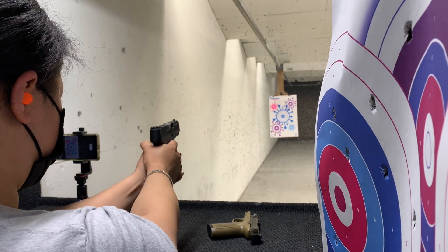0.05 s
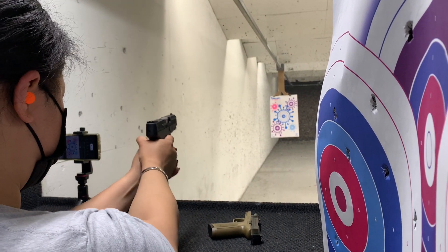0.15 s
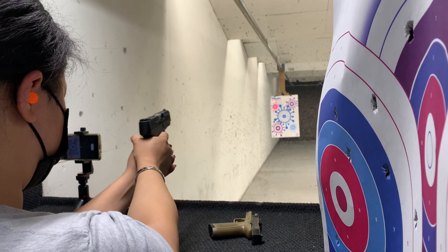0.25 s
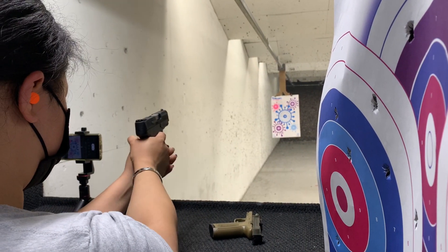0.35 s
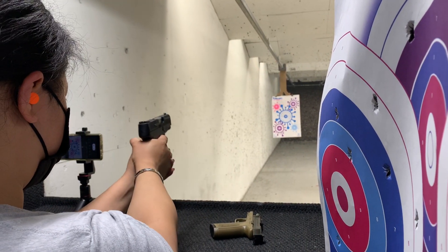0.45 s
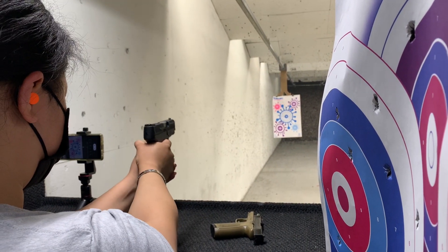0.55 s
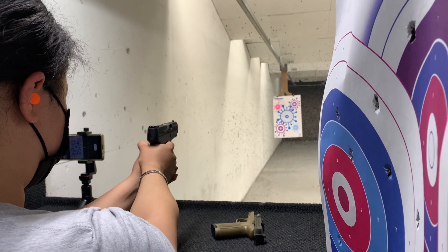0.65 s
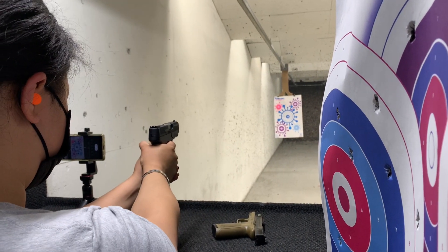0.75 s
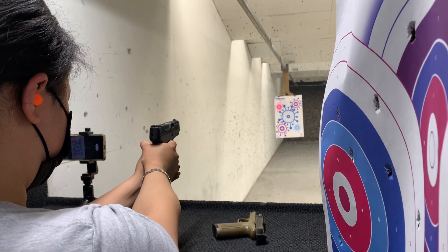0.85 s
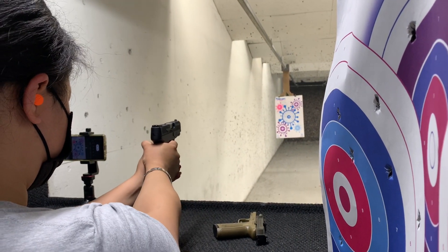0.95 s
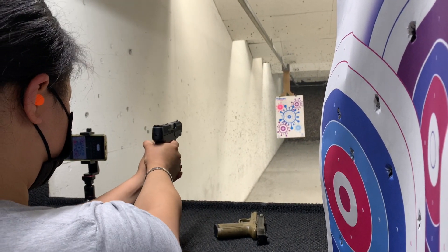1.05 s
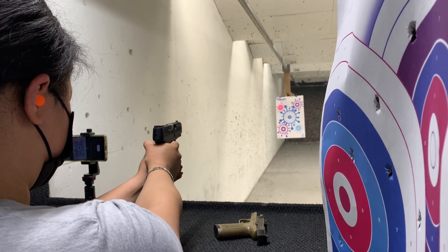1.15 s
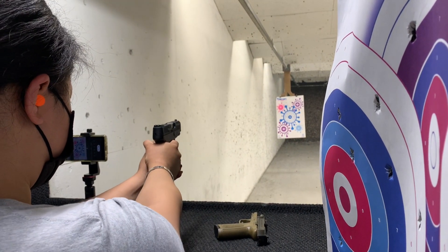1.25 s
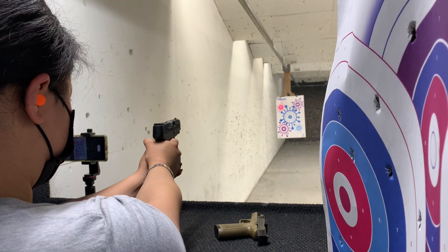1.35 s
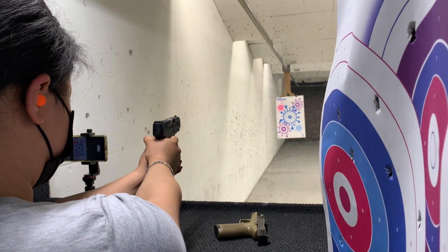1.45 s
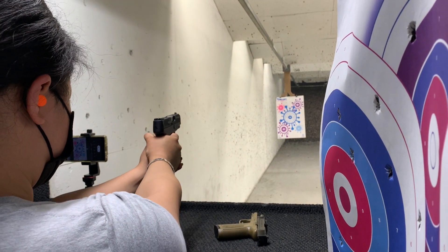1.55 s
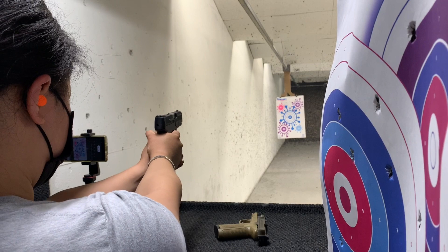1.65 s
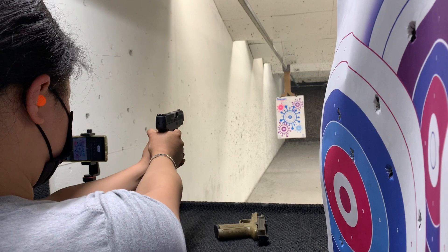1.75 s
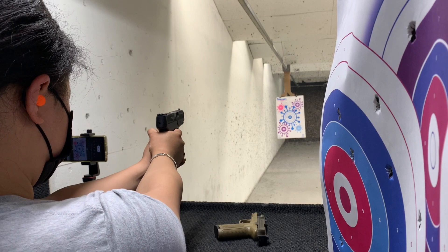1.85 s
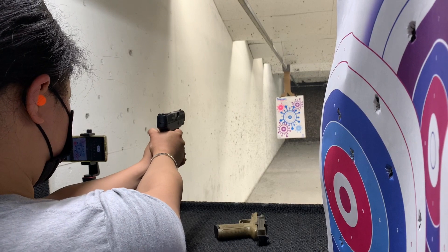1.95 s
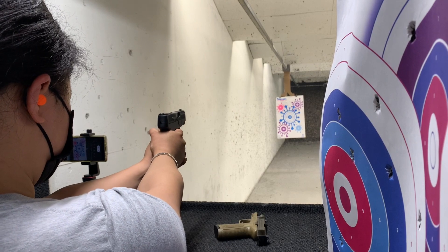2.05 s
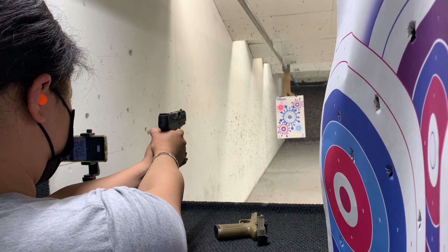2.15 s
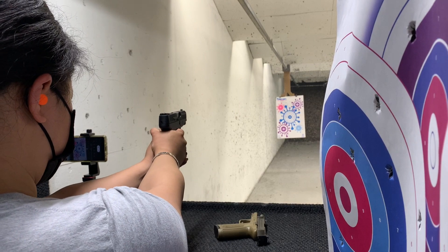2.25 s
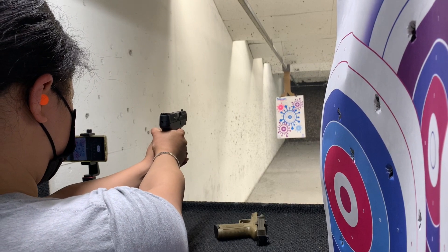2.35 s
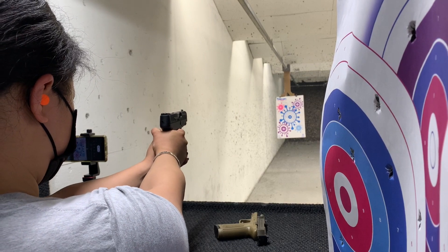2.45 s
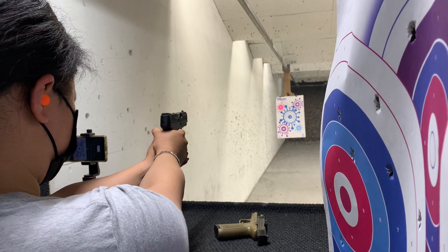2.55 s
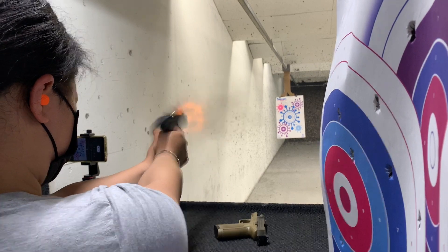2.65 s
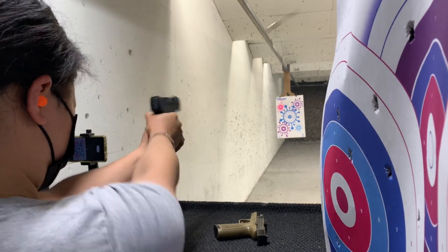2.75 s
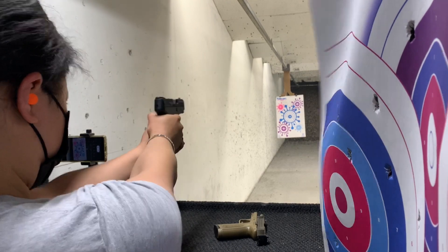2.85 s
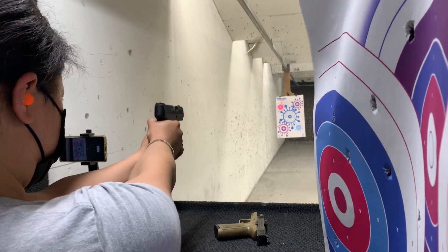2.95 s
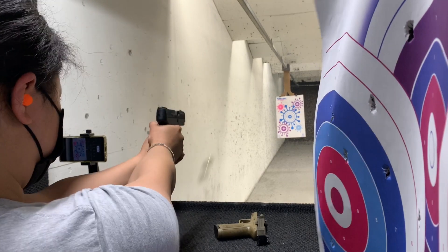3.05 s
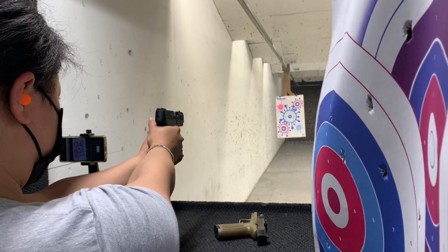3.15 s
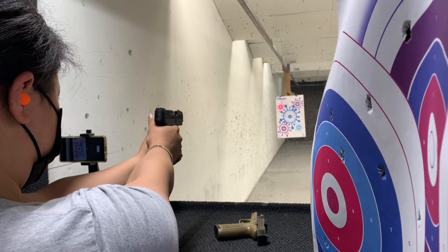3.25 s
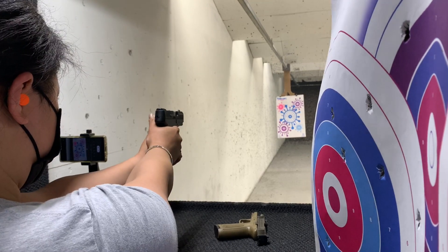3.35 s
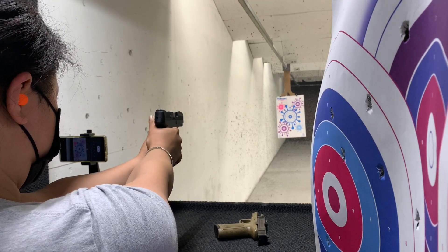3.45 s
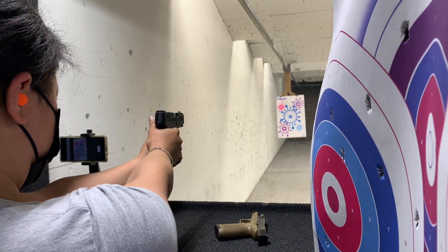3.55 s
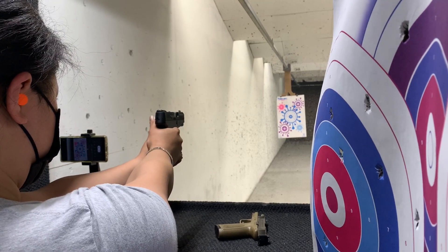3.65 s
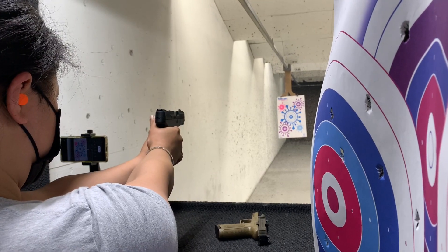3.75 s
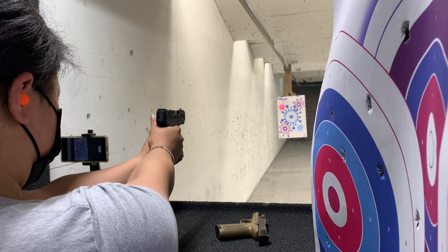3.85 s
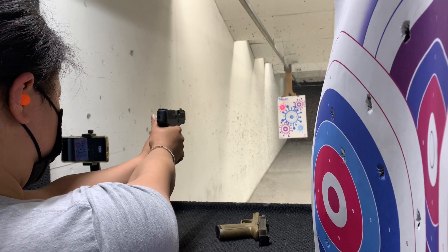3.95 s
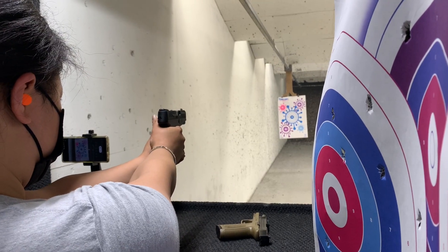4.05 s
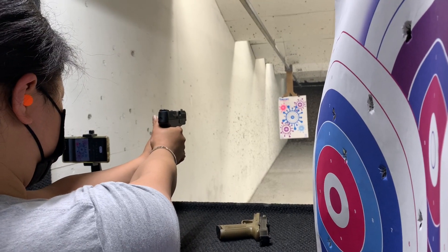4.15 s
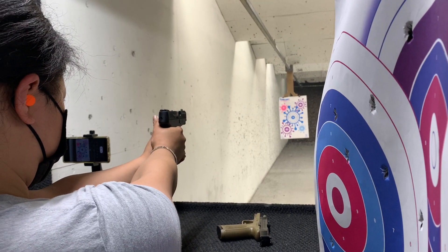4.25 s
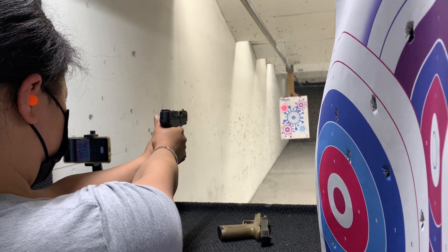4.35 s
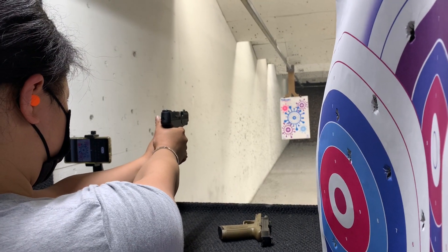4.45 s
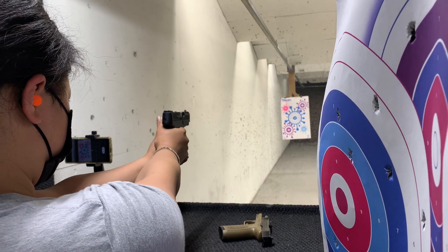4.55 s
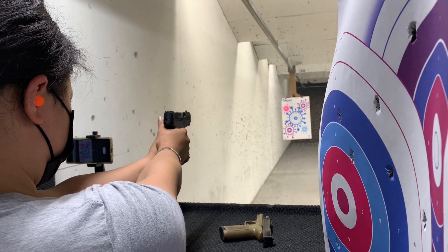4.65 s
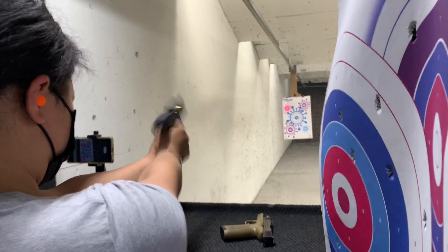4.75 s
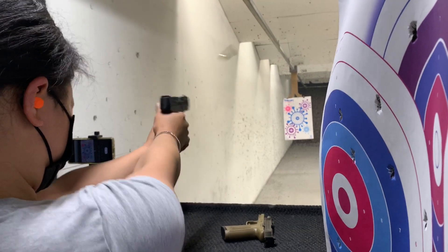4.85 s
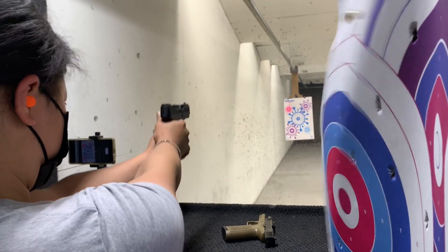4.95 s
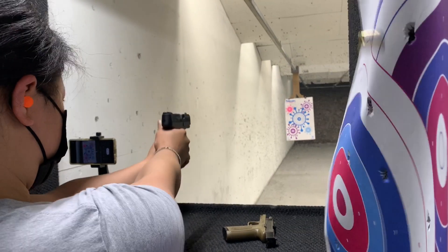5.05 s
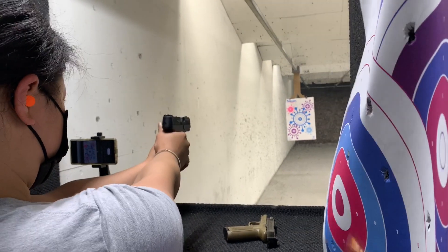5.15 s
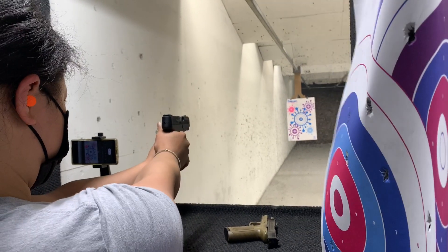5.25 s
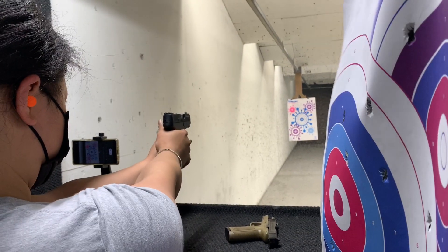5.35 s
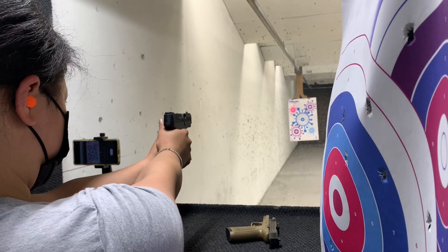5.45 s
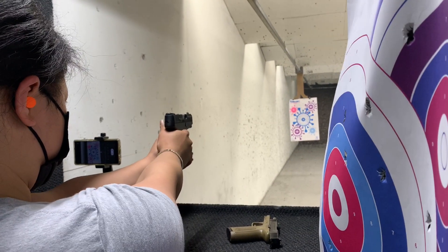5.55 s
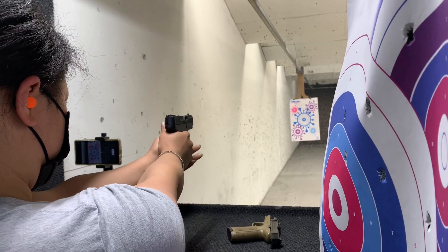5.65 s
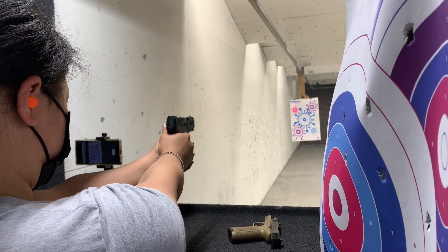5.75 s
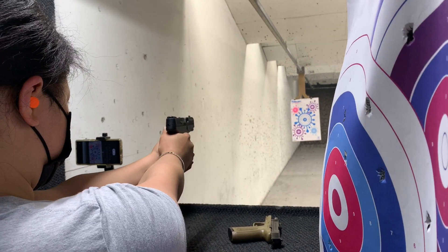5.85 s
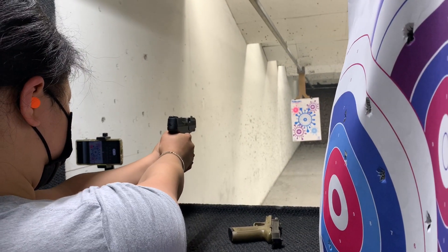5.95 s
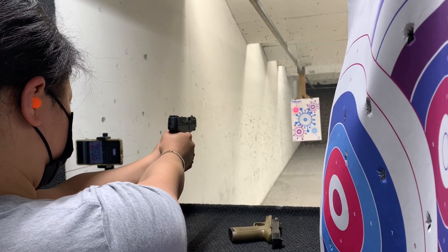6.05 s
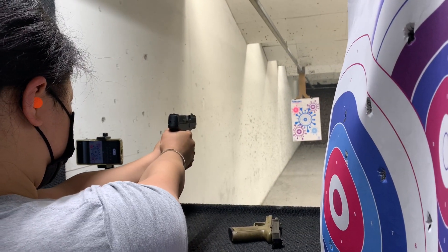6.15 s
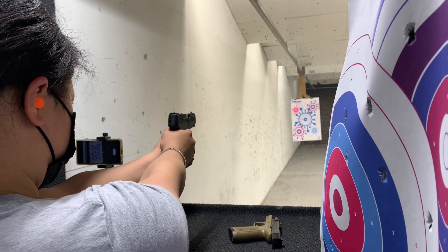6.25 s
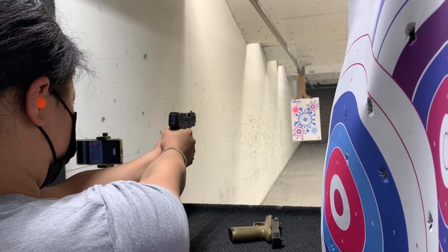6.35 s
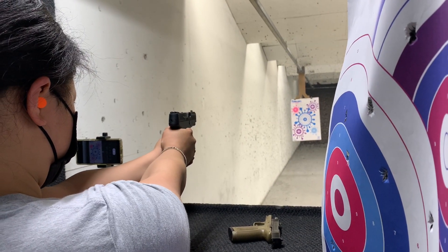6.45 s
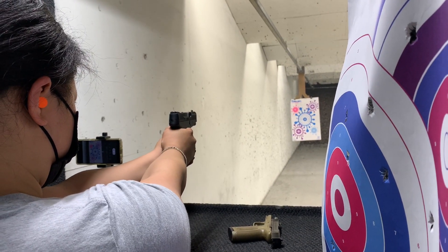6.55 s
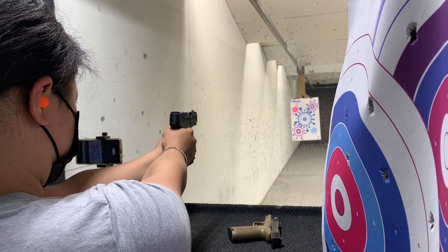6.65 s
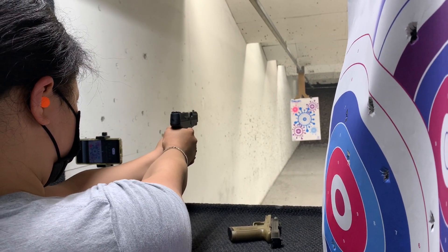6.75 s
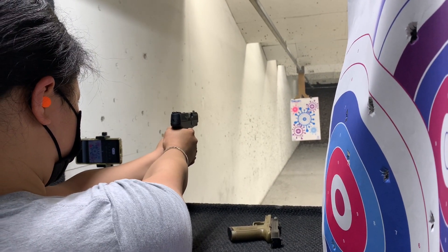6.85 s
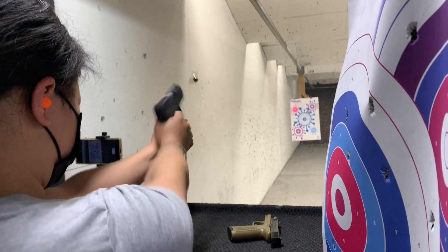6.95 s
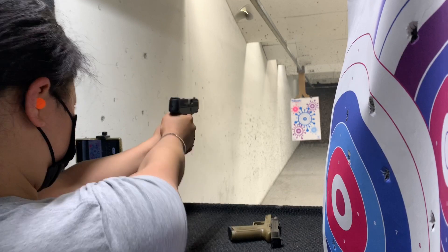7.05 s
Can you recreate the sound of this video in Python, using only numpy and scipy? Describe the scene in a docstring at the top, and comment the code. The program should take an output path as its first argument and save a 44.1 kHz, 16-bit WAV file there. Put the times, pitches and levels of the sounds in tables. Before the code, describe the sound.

A low ventilation rumble with faint fan hum fills a concrete indoor range, a previous shot's resonance still dying. At about 0.6, 1.0 and 1.35 seconds a pistol in the next booth fires three thick, booming blasts, rattling the partition. Small brass cases clack and ping on concrete around 1.9 to 2.4. At 2.55 a farther shot is overtaken by a sharp, close crack at 2.65. Cases tinkle and hop from 3.1 to 4, with faint soft scrapes near 3.3 and 4.2. Another close shot cracks at 4.75, then a distant boom at 5.06. A bright case pings at 5.5 and bounces in quickening hops past 6. One more faint ping at 6.7 precedes the last close blast at 6.9, cut short in its echo. About 0.2 seconds after each earlier shot the room tail swells again as the limiter releases, leaving faint, beating steel ringing. Close stereo microphone, peaks rounded off.

```python
"""Three pistols in an indoor range

Recorded on two microphone ports: one pistol just ahead, one in the next booth and one further off.
Each shot is a crack and a boom of shaped noise, then a second swell of the room tail about 0.2 s on,
as the recorder's limiter lets go; this late swell is written in as noise at a set delay and level.
Damped sines make the standing waves and the steel fittings that ring on. Spent brass cases ping, clack
and hop on the concrete, with faint scrapes between, over rumbling ventilation and two fan lines."""
import sys
import numpy as np
from scipy import signal
from scipy.fft import rfft, irfft, next_fast_len
from scipy.io import wavfile
from scipy.ndimage import map_coordinates

SR = 44100
rng = np.random.default_rng(int(sys.argv[2]) if len(sys.argv) > 2 else 0)


def master_out(mix):
    """Clip the mix to full scale and print it as 16-bit PCM to the path in sys.argv[1]."""
    frames = np.transpose(np.atleast_2d(mix))
    ceiling = np.clip(frames, -1, 1)
    pcm = np.round(ceiling * 32767).astype(np.int16)
    wavfile.write(sys.argv[1], SR, pcm)


N = 313110  # length of the scene (samples)
AGE = np.arange(2 * SR) / SR  # time since a blow (s)
BRIEF = np.arange(SR // 2) / SR  # the same for short sounds (s)

# the shots: (time [s], pistol, crack level [dB], boom level [dB], late swell level [dB],
# ringing steel level [dB], standing wave level [dB])
SHOTS = [(0.643, "next", -15, -12, -27, -61, -39.5), (1.000, "next", -12, -13, -28.5, -61.5, -39.5),
         (1.350, "next", -14.5, -12.5, -34, -59, -38), (2.549, "far", -24, -21.5, -31.5, -65.5, -44.5),
         (2.652, "own", -12.5, -17, -31.5, -62, -36.5), (4.7466, "own", -15.5, -15.5, -27.5, -72.5, -37.5),
         (5.064, "far", -21.5, -16.5, -32.5, -67.5, -26.5), (6.8962, "own", -14, -16, -27.5, -64, -36.5)]
# colour of the slap of a blast off the near booth: (frequency [Hz], relative level [dB per Hz])
SLAP_COLOUR = [(250, -21.5), (550, -2.5), (750, -5), (1100, 0.5), (1500, -7.5), (3000, -15.5), (12000, -38)]


def amp(db):
    """Decibels to gain."""
    return 10 ** (np.asarray(db) / 20)


def unit(x):
    """Scale to rms 1."""
    return x / np.sqrt(np.mean(x ** 2) + 1e-20)


def along(points, hz):
    """Read (frequency, value) points at hz, on a log frequency axis."""
    f, v = np.transpose(points)
    return np.interp(np.log(hz + 1), np.log(f + 1), v)


def wobble(rate, size):
    """A smooth random curve with rate knots a second."""
    knots = rng.standard_normal(int(size * rate / SR) + 4)
    return map_coordinates(knots, [np.arange(size) * rate / SR])


def filtered(x, response):
    """Shape x by a response given as a function of frequency."""
    n = x.shape[-1]
    m = next_fast_len(n + SR // 4)  # padded, so that the end does not wrap onto the start
    return irfft(rfft(x, m) * response(np.fft.rfftfreq(m, 1 / SR)), m)[..., :n]


def add(track, s, sound):
    """Mix a sound into the track at time s, cut where the track ends."""
    room = track[:, round(s * SR):][:, :sound.shape[-1]]
    room += sound[..., :room.shape[-1]]


def white(t=AGE):
    """Two unrelated white noises."""
    return rng.standard_normal((2, len(t)))


def field(noise, spectrum):
    """Colour a noise pair into left and right: much alike in the bass, less so above."""
    # stereo width: (frequency [Hz], side over mid [dB])
    width = [(50, -9), (150, -7), (280, -3.5), (450, -1.5), (800, 4), (1600, 0), (4000, 0), (14000, 0)]
    mid, side = filtered(noise, lambda hz: amp(along(spectrum, hz)))
    side = filtered(side, lambda hz: amp(along(width, hz)))
    return np.array([mid + side, mid - side]) / np.std(mid)


def dying(x, t60, hold):
    """Hold the level, then let each frequency die at its own speed."""
    hz, t, z = signal.stft(x, SR, nperseg=512)
    fade = amp(-60 * np.maximum(t - hold, 0) / along(t60, hz)[:, None])
    return signal.istft(z * fade, SR, nperseg=512)[1][:, :x.shape[-1]]


def swell(rise, t=AGE):
    """A smooth rise from 0 to 1."""
    return 1 - np.exp(-(t / rise) ** 2)


def ring(modes, scatter_db, t=AGE):
    """Damped modes, struck at new strengths and heard at slightly different phases by the two ports."""
    out = np.zeros((2, len(t)))
    for hz, db, t60 in modes:
        phase = rng.uniform(0, 2 * np.pi) + rng.standard_normal((2, 1)) / 2
        strength = amp(db + scatter_db * rng.standard_normal())
        fade = strength * np.exp(-np.log(1000) * t / t60)
        out += fade * np.sin((2 * np.pi * hz * t + phase).astype(np.float32))
    return out * np.minimum(1, 10 * (t[-1] - t))  # the last trace of the ring fades to silence


def shots_of(who):
    """Time and levels of the shots of one pistol."""
    return [(s, *levels) for s, name, *levels in SHOTS if name == who]


def ventilation():
    """Air rumbles in the ducts under the slightly unsteady lines of the fans."""
    # colour of the duct air: (frequency [Hz], relative level [dB per Hz])
    air_colour = [(20, -43), (39, -16), (58, -3.5), (86, -20), (150, -15), (250, -29), (400, -36.5),
                  (700, -43.5), (1500, -50.5), (4000, -60), (10000, -66), (16000, -73)]
    # fan lines: (frequency [Hz], mean level [dB])
    fan_lines = [(58, -67.5), (150, -81.5)]
    out = amp(-66.5 + .7 * wobble(1, N)) * field(rng.standard_normal((2, N)), air_colour)
    t = np.arange(N) / SR
    for hz, db in fan_lines:
        level = np.sqrt(2) * amp(db + 1.5 * wobble(3, N))
        out += level * np.sin(2 * np.pi * hz * t + 1.1 * wobble(6, N))
    return out


def scuffs():
    """Faint, soft scrapes between the shots: noise that swells, dies and flutters in level."""
    # the scrapes: (time [s], level [dB], rise [s], t60 [s])
    scrapes = [(3.345, -68, 0.0085, 0.62), (4.16, -77, .02, 0.94)]
    # their colour: (frequency [Hz], relative level [dB per Hz])
    colour = [(600, -6), (1500, 1.5), (4000, -2), (8000, -8), (15000, -16.5)]
    out = np.zeros((2, N))
    for s, db, rise, t60 in scrapes:
        level = amp(db - 60 * AGE / t60 + 2.5 * wobble(60, len(AGE)))
        add(out, s, field(white(), colour) * swell(rise) * level)
    return out


def contacts():
    """Each case lands and may hop on, every contact softer and lower in clack than the last."""
    # cases landing: (time [s], first ping level [dB], first clack level [dB],
    # first clack pitch [Hz], first hop [s], number of hops)
    landings = [(1.935, -72, -68, 5400, .286, 1), (2.395, -78.5, -66, 5230, 0, 0),
                (2.422, -70, -58.5, 5150, 0, 0), (3.127, -87, -68, 5310, 0, 0),
                (3.403, -62.5, -67, 4800, .535, 1), (3.535, -76, -75.5, 4200, 0, 0),
                (5.527, -60, -69.5, 5370, .527, 3), (6.725, -73.5, -92, 5280, 0, 0)]
    hop_shrink = .495  # each hop lasts this share of the one before
    ping_loss_db, clack_loss_db, wash_loss_db = 5, 2.2, 7.5  # lost at each bounce
    clack_sag = 0.925  # clack pitch over that of the contact before
    for s, ping_db, clack_db, clack_hz, hop, hops in landings:
        wash_db = (ping_db + clack_db) / 2 - 3.5
        for k in range(round(hops) + 1):
            yield (s, ping_db - k * ping_loss_db, clack_db - k * clack_loss_db,
                   clack_hz * clack_sag ** k, wash_db - k * wash_loss_db)
            s = s + hop * hop_shrink ** k


def cases():
    """Each case clacks on the concrete, pings as its brass modes ring, and leaves a faint wash in the room."""
    # modes of a brass case: (frequency [Hz], relative level [dB], t60 [s])
    brass = [(10790, -2.5, .4), (10800, -5.5, .42), (13470, -14, .15)]
    # colour of the contact noise: (frequency [Hz], relative level [dB per Hz])
    clack_colour = [(1500, -20.5), (3200, -3), (5000, -1.5), (7000, -2.5), (10000, -1.5), (13500, -1.5),
                    (16000, -11.5)]
    out, t = np.zeros((2, N)), BRIEF
    for s, ping_db, clack_db, clack_hz, wash_db in contacts():
        ping = ring(brass, scatter_db=-4.5, t=t) * amp(2.5 * wobble(90, len(t)))
        noise = field(white(t), clack_colour)
        # a resonance of Q 7 gives the clack its pitch
        clack = unit(filtered(noise, lambda hz: 1 / (1 + 7j * (hz / clack_hz - clack_hz / (hz + 1)))))
        clack = clack * (amp(1 - 60 * t / 0.037) + amp(-13 - 60 * t / .33))
        slow_wash = amp(-2.5 - 60 * t / 0.4) * swell(0.0089, t)
        quick_wash = amp(9.0 - 60 * t / 0.016)
        wash = noise * (slow_wash + quick_wash)
        contact = amp(ping_db) * ping + amp(clack_db) * clack + amp(wash_db) * wash
        add(out, s, contact * swell(0.0008, t))
    return out


def afterring(twin_db, split_hz, earlier_db):
    """Standing waves and steel outlast the boom; like fittings are slightly detuned, so their lines beat."""
    # steel fittings that ring after every shot: (frequency [Hz], relative level [dB], t60 [s])
    fittings = [(463, 3, 1), (510, 8, 1.7), (738, -8, 2.8), (765, -6.5, 1.6), (808, -3, 2.7),
                (866, -2.5, 2.5), (894, 2.5, 2), (930, 0.5, 2.2), (990, -7.5, 2.8), (1023, -9.5, 2.2),
                (1060, -7, 2.1), (1130, -9, 3.2), (1170, -7, 2.9), (1250, -8, 2.5), (1330, -4.5, 1.9),
                (1367, -4.5, 2.4), (1432, -7.5, 2.2), (1530, -8.5, 2.4), (1723, -8.5, 2.1),
                (1846, -12.5, 1.9), (2008, -17, 2.7), (2300, -17, 3.8), (2370, -15.5, 3.2),
                (2552, -17, 2.1)]
    # standing waves between the walls: (frequency [Hz], relative level [dB], t60 [s])
    standing = [(160.3, 1, 1.75), (285, -16, .9), (327, -14, 1), (347, -11, .85)]
    # one long-lived fitting, whose two close modes beat about seven times a second: (frequencies [Hz])
    long_hz = (622.2, 629.1)
    long_modes = [(hz, -76, 12) for hz in long_hz]  # (Hz, mean dB when stirred, t60 s)
    out = np.zeros((2, N))
    for s, *_, steel_db, wave_db in SHOTS:
        twins = [(hz + split_hz * rng.standard_normal(), db + twin_db, t60) for hz, db, t60 in fittings]
        steel = amp(steel_db) * ring(fittings + twins, scatter_db=1.5)
        waves = amp(wave_db) * ring(standing, scatter_db=3.0)
        add(out, s, (steel + waves) * swell(.025))
    t = np.arange(N) / SR
    # near blasts, or a run of them, stir the long-lived fitting
    for s, *_ in shots_of("own") + shots_of("next")[-1:]:
        long_ring = ring(long_modes, scatter_db=.5, t=t)
        add(out, s, long_ring * swell(.025, t) * amp(1.5 * wobble(7.6, N)))
    add(out, 0, amp(earlier_db) * ring(standing[:1], scatter_db=1.5))  # still dying from an earlier shot
    return out


def partition(ring_hz, db, t60, delay, rise, lag, blur):
    """The next pistol's blast rattles the booth wall; the second port hears its tone about a quarter cycle late."""
    out, t = np.zeros((2, N)), BRIEF
    for s, *_ in shots_of("next"):
        phase = 2 * np.pi * ring_hz * (t - np.array([[0], [lag]])) + blur * wobble(280, len(t))
        rattle = np.sin(phase) + 0.25 * field(white(t), SLAP_COLOUR)
        add(out, s + delay, amp(db - 60 * t / t60) * swell(rise, t) * rattle)
    return out


def pistol(shots, crack_colour, boom_colour, crack_rise, crack_hold, crack_t60,
           boom_rise, boom_hold, treble_hold, clump_db):
    """Crack, boom and late swell of one pistol; the paths to the walls stay nearly the same each shot."""
    # decay of the boom and of the late swell: (frequency [Hz], t60 [s])
    boom_t60 = [(60, 0.19), (250, 0.56), (800, 0.42), (3000, 0.47), (12000, 0.38)]
    late_t60 = [(60, 1.4), (160, 1), (400, 0.82), (1100, 0.66), (3000, 0.87), (8000, 0.5), (14000, 0.52)]
    # colour of the late swell: (frequency [Hz], relative level [dB per Hz])
    late_colour = [(18, -45.5), (30, -21.5), (59, -8), (107, -18), (158, -2.5), (312, -2), (426, -2),
                   (754, -17), (1410, -21), (1780, -26.5), (8250, -44), (10400, -47.5), (11900, -67),
                   (13200, -56), (15000, -65.5)]
    out = np.zeros((2, N))
    crack_paths, boom_paths = white(), white()
    clumps = unit(amp(clump_db * wobble(900, len(AGE))))  # reflections in bunches; even at 0 dB

    def fresh(paths):
        """Mostly the lasting paths, with some new noise."""
        return (2 * paths + white()) / np.sqrt(5)

    for s, crack_db, boom_db, late_db, *_ in shots:
        crack_fade = amp(-60 * np.maximum(AGE - crack_hold, 0) / crack_t60)
        crack = field(fresh(crack_paths), crack_colour) * swell(crack_rise) * crack_fade
        walls = field(fresh(boom_paths) * clumps, boom_colour)
        body = filtered(walls, lambda hz: 1 / (1 + (hz / 2000) ** 4))
        treble = walls - body
        # the treble is absorbed sooner than the body of the boom
        boom = dying(body, boom_t60, boom_hold) + dying(treble, boom_t60, treble_hold)
        boom = boom * swell(boom_rise)
        add(out, s, amp(crack_db) * crack + amp(boom_db) * boom)
        late_swell = dying(field(white(), late_colour), late_t60, hold=0.051) * swell(0.043)
        add(out, s + .19, amp(late_db) * late_swell)
    return out


def muzzle(snap_db, t60, slap_db, slap_delay, slap_t60):
    """The nearest blast comes straight to the microphone, slaps back off its booth and sets it ringing."""
    # colour of the direct blast: (frequency [Hz], relative level [dB per Hz])
    snap_colour = [(300, -15.5), (900, -3), (2500, -1.5), (6000, -0.5), (10000, -5.5), (16000, -6)]
    # modes of the booth: (frequency [Hz], mean level [dB], t60 [s])
    booth = [(247.6, -20.5, 0.77), (497, -10, 0.14), (682, -18, .3), (785, -24, 0.38), (1012, -24, .28),
             (1150, -24, 0.55), (1300, -24, 0.17)]
    out, t = np.zeros((2, N)), BRIEF
    for s, *_ in shots_of("own"):
        snap = field(white(t), snap_colour) * amp(snap_db - 60 * t / t60) * swell(.0006, t)
        add(out, s, snap + ring(booth, scatter_db=1.5, t=t) * swell(0.012, t))
        slap = field(white(t), SLAP_COLOUR) * amp(slap_db - 60 * t / slap_t60)
        add(out, s + slap_delay, slap * swell(0.0012, t))
    return out


def scene():
    """Three shooters, their brass and the room; rises, holds, delays and t60 in seconds."""
    # crack and boom colours of each pistol: (frequency [Hz], relative level [dB per Hz])
    own_crack = [(35, -41.5), (60, -8.5), (244, -15), (651, 1), (1110, -7.5), (1380, -15.5), (1950, -10),
                 (3040, -17), (8920, -33), (10000, -18.5), (11800, -27), (13300, -28), (16000, -47.5)]
    own_boom = [(18, -40.5), (30, -14.5), (112, -6.5), (266, -7), (394, -9), (486, -3.5), (1070, -16),
                (1220, -14.5), (1460, -21.5), (1590, -17.5), (1860, -20.5), (8300, -30.5), (12000, -36.5),
                (13300, -34), (16000, -63.5)]
    next_crack = [(59, -37), (100, -5.5), (271, -4), (736, -2.5), (991, -7), (2040, -7.5), (3400, -17),
                  (8640, -19), (11600, -32.5), (13200, -29.5), (16000, -44)]
    next_boom = [(18, -41.5), (30, -26), (59, -10.5), (112, -11.5), (233, -2.5), (394, -5.5), (512, -6.5),
                 (632, -3.5), (844, -11), (1220, -12), (2410, -22.5), (9970, -31), (11700, -37.5),
                 (13300, -32), (16000, -53)]
    far_crack = [(59, -29), (100, -4.5), (1870, -8), (3250, -20), (3700, -15), (9610, -30), (11900, -33.5),
                 (13500, -34.5), (16000, -47)]
    far_boom = [(18, -44.5), (30, -12.5), (95, -9.5), (184, -0.5), (259, -7), (336, -4), (554, -4),
                (1190, -16), (1960, -18.5), (9460, -33), (12000, -42.5), (13300, -34.5), (16000, -69.5)]
    room = ventilation() + scuffs() + cases()
    ringing = afterring(twin_db=-1, split_hz=9.2, earlier_db=-56.5)
    wall = partition(ring_hz=606, db=-7.0, t60=0.05, delay=.012, rise=0.0022, lag=0.00044, blur=1.1)
    far = pistol(shots_of("far"), far_crack, far_boom, crack_rise=0.001, crack_hold=.015, crack_t60=0.098,
                 boom_rise=.013, boom_hold=0.084, treble_hold=.035, clump_db=-1.0)
    beside = pistol(shots_of("next"), next_crack, next_boom, crack_rise=0.025, crack_hold=.024, crack_t60=0.14,
                    boom_rise=0.011, boom_hold=0.059, treble_hold=0.03, clump_db=-1.0)
    own = pistol(shots_of("own"), own_crack, own_boom, crack_rise=0.0019, crack_hold=0.011, crack_t60=0.045,
                 boom_rise=0.014, boom_hold=0.087, treble_hold=0.046, clump_db=0.0)
    direct = muzzle(snap_db=-10.5, t60=0.015, slap_db=-11.0, slap_delay=.0075, slap_t60=0.095)
    return room + ringing + wall + far + beside + own + direct


def record(dry):
    """The microphone ports colour the treble, the tallest peaks are rounded off, and the band ends steeply."""
    # microphone colour: (frequency [Hz], gain [dB])
    port = [(3300, -0.5), (4100, 2), (5200, 0.05), (11000, 1), (11600, -9), (12100, -15), (12700, 3),
            (13700, 2.5), (14500, 1), (15100, -16), (15700, -4.5), (16300, -21)]
    x = filtered(dry, lambda hz: amp(along(port, hz)))
    x = x / (1 + np.abs(x) ** 8) ** (1 / 8)
    return filtered(x, lambda hz: hz < 16400)


dry = scene()
out = record(dry)
master_out(out)
```